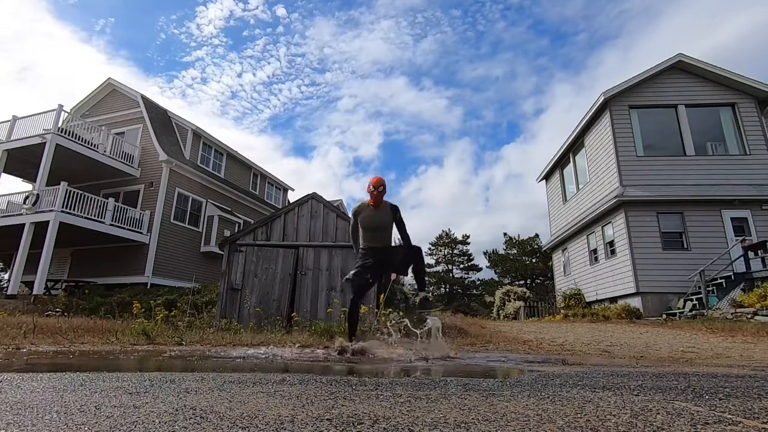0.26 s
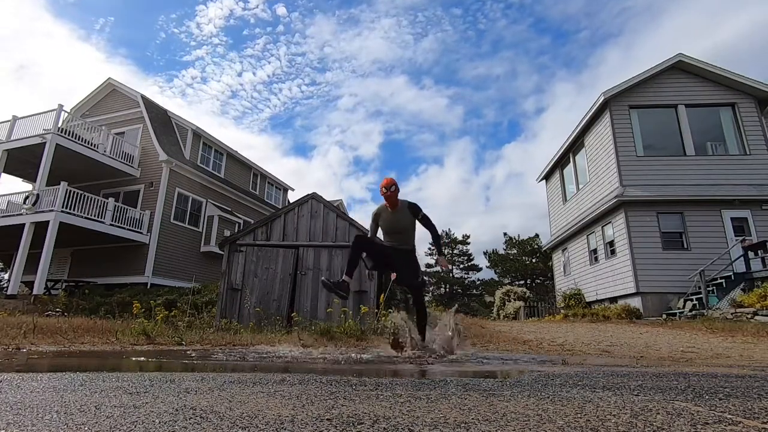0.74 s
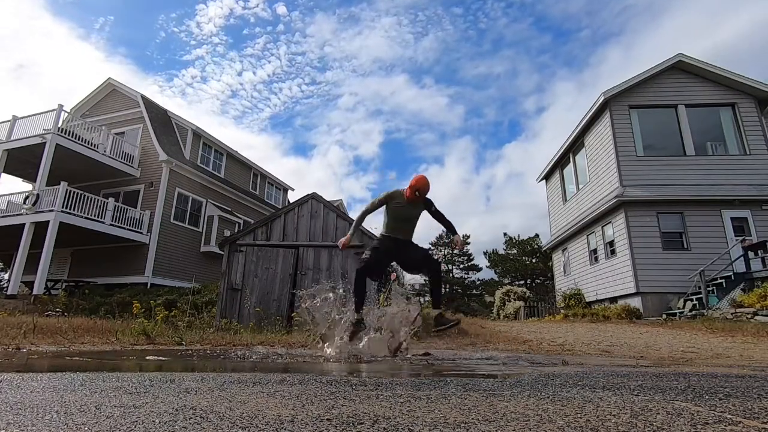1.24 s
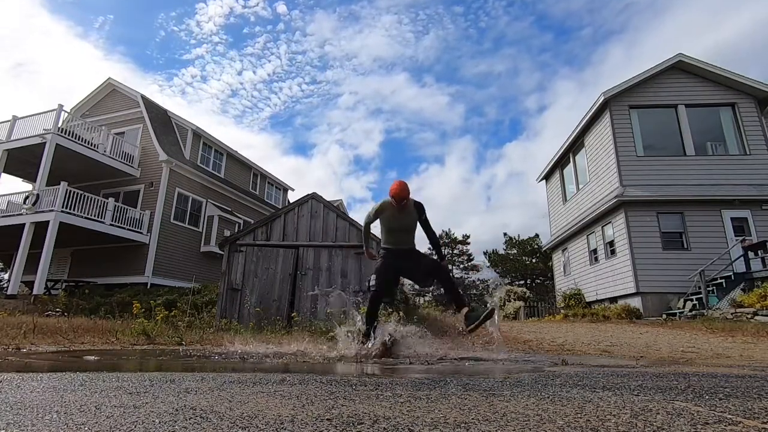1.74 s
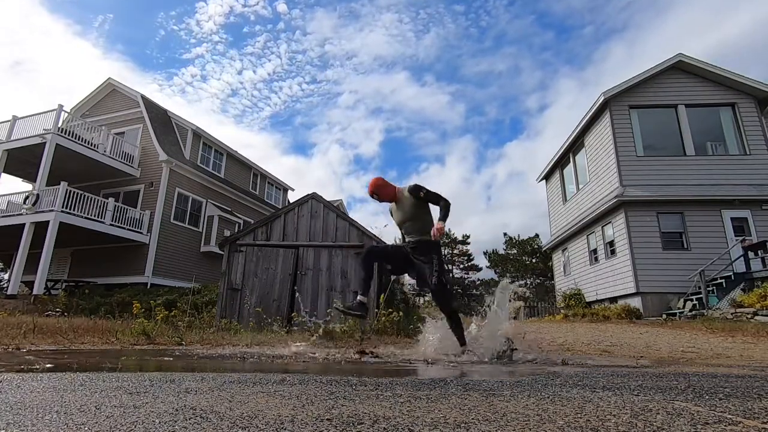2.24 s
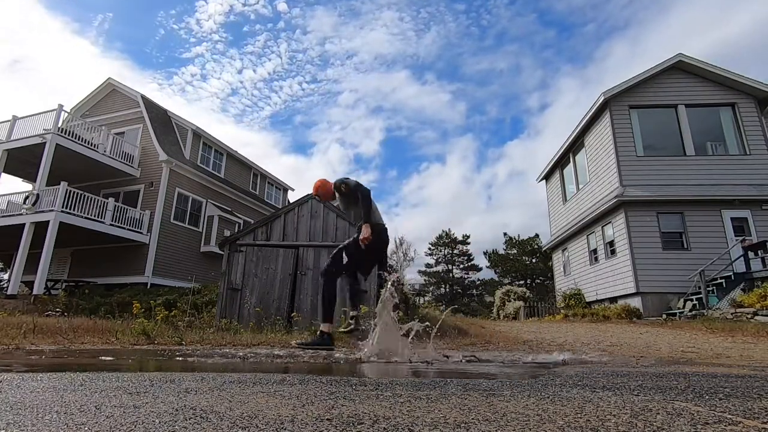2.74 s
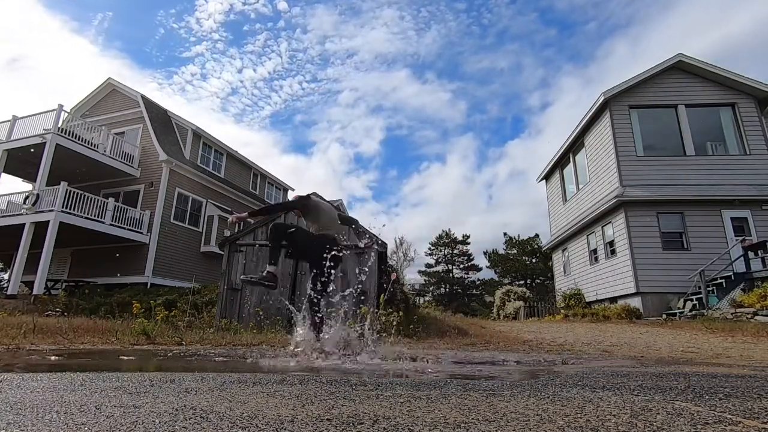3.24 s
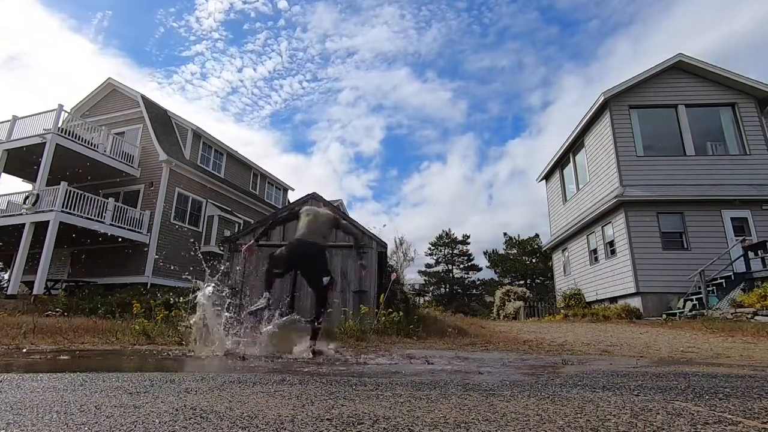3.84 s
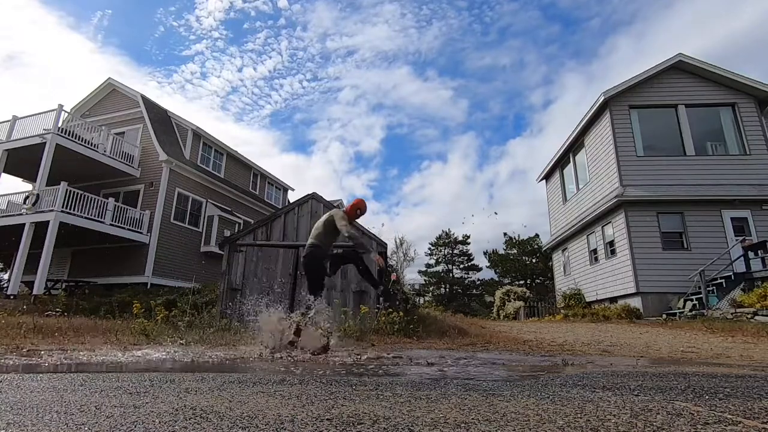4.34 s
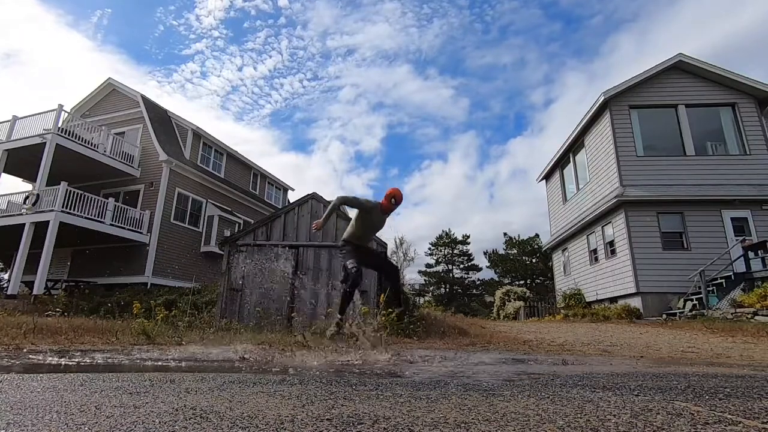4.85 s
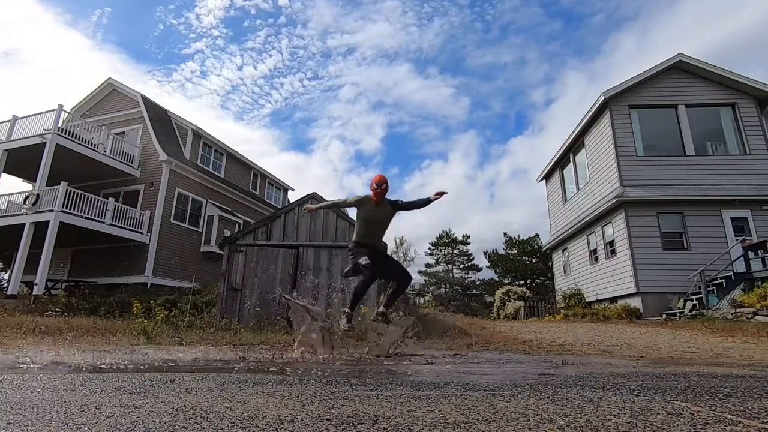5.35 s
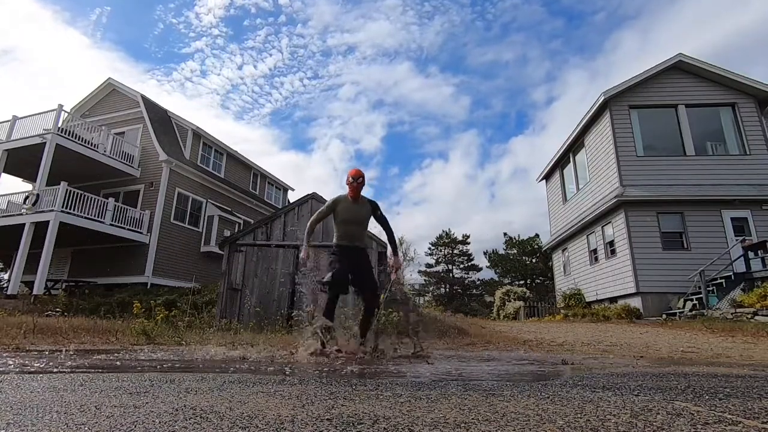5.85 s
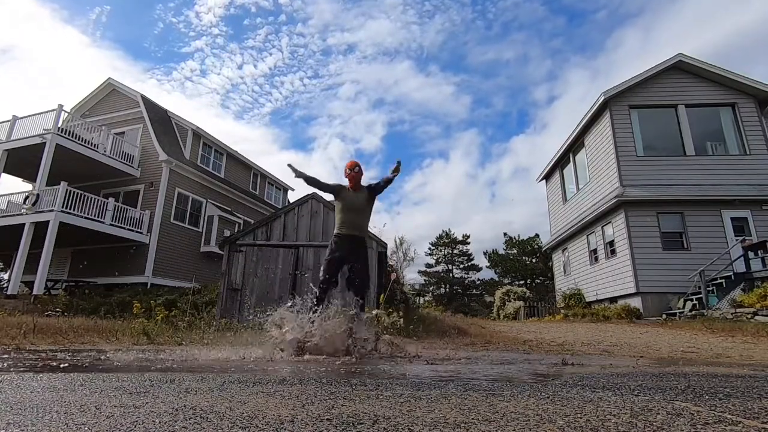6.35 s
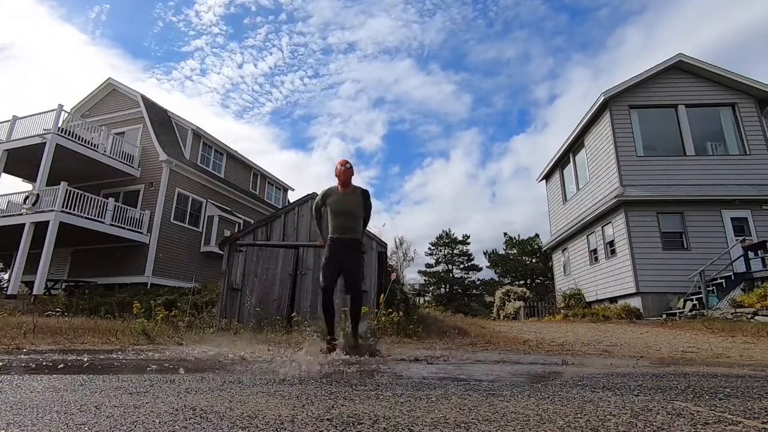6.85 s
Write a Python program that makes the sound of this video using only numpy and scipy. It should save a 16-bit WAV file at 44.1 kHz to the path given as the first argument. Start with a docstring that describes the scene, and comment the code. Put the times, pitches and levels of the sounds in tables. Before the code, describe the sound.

A low stereo microphone a few metres away hears someone stomping in a rain puddle on a paved road. Falling spray is already pattering at 0 s, with a faint steady hum that fades by about 0.7 s. Fairly soft splashes land at 0.25 and 0.63 s, then a sharp slap with a hollow thump at 1.0 s. Steps continue about every 0.35 s, strongest from 2.8 to 4 s, each with a low ground thud, a heel slap and a rain of bright droplets and gurgling bubbles. Fine drops tick near the microphone around 3.5 s. Heavier, slower stomps fall at 5.0 and 5.5 s, then softer-edged ones at 5.8 and 6.2 s, with water sloshing down until 6.7 s. Small quick splashes and round bubble plops finish from 6.8 to 7.1 s. Light breeze and faint house echoes lie beneath.

```python
"""A paved road with a rain puddle: someone stomps in it from foot to foot, a few metres from a low microphone.
Each sole slaps the water (noise bursts), traps a pocket of air that thumps (a falling tone) and shakes
the ground (low noise). The thrown water falls back as spray, drops and mist (random clicks, noise bursts)
and leaves ringing bubbles (short rising tones). Houses give a faint echo (sparse random reflections);
a light breeze (low noise) touches the microphone, and a distant hum (a steady tone) soon fades."""
import sys
import numpy as np
from scipy import signal
from scipy.fft import rfft, irfft
from scipy.io import wavfile

SR = 44100
rng = np.random.default_rng(int(sys.argv[2]) if len(sys.argv) > 2 else 0)


def wav_record(signal):
    """Record a signal, one row per channel, as 16-bit PCM in the file named by sys.argv[1]."""
    frames = np.transpose(np.atleast_2d(signal))
    bounded = np.clip(frames, -1, 1)
    # unit amplitude maps onto the largest positive 16-bit level
    quanta = np.round(bounded * 32767).astype(np.int16)
    wavfile.write(sys.argv[1], SR, quanta)


N = 312832  # length in samples
TIME = np.arange(N) / SR  # seconds

# balance of low and high sound in spray and drops, overall level aside: [pitch_hz, level_db]
SPRAY_COLOUR = [(300, -40.5), (900, -14.5), (1500, 1.5), (2300, 3.5), (3200, 4.5), (4200, -1.5),
                (5600, -8.5), (7500, -13), (11000, -32)]
# a foot hits the puddle: [start_s, slap_db, rise_s, decay_s, brightness_db_per_octave, left_over_right_db,
#   air_pocket_db, pocket_start_pitch_hz, pocket_swell_s, ground_shudder_db, spray_db]
STOMPS = [(0.2528, -19, 0.00036, 0.0091, 3.5, -5, -36, 338, 0.0055, -39.5, -35),
          (0.6335, -24, 0.0016, 0.023, 1.5, -8.5, -29.5, 296, .0066, -43.5, -36),
          (0.9876, -14, 0.00041, 0.0021, 6, -6.5, -11.5, 740, 0.00093, -32.5, -36.5),
          (1.344, -18, 0.00089, 0.0059, 2, -8, -21.5, 424, 0.0019, -40, -33),
          (1.6923, -16, .0003, 0.0032, 2.5, -5, -11, 723, 0.002, -35.5, -47),
          (2.047, -17, 0.00076, .0037, 1, -9, -21, 500, 0.0017, -39, -33),
          (2.4484, -18, 0.00052, 0.0078, 1.5, -8.5, -19.5, 710, 0.0031, -36.5, -36.5),
          (2.805, -11, 0.00089, 0.0023, .5, -2, -14.5, 342, 0.0018, -38, -50),
          (3.1543, -15, 0.001, 0.0026, 0, -2, -13, 570, 0.0024, -40, -41.5),
          (3.519, -13, 0.00012, 0.0043, 1.5, -2, -15.5, 310, 0.0041, -36, -33),
          (3.8709, -14.5, 0.00033, 0.0055, -8, -1.5, -13.5, 382, 0.0021, -34.5, -32.5),
          (4.2293, -16.5, .0004, 0.006, 2, -2, -25, 306, 0.001, -44, -51),
          (4.584, -15.5, 0.0015, 0.0037, -2, -5, -28, 383, 0.003, -35.5, -43),
          (5.008, -17, 0.00023, 0.0088, -2.5, -7, -19.5, 256, 0.0034, -25.5, -34.5),
          (5.493, -18.5, .002, 0.014, -0.5, -6.5, -19.5, 280, 0.0063, -31, -31.5),
          (5.828, -20.5, 0.0053, 0.0038, -1.5, -4.5, -23.5, 470, 0.0027, -52, -32),
          (6.168, -18, 0.0048, 0.013, -3, -2.5, -23, 604, 0.0049, -36, -36),
          (6.791, -28.5, 0.0045, 0.013, -5, 2, -37, 307, 0.0055, -44, -44),
          (6.953, -26.5, 0.011, 0.04, -3.5, -3.5, -42, 592, 0.0067, -55, -38),
          (7.017, -25, 0.0033, 0.015, 0.5, -5.5, -42, 600, 0.0043, -58, -38)]


def gain_of(db):
    """Turns decibels into an amplitude factor."""
    return 10 ** (np.asarray(db) / 20)


def evened(x):
    """Scales a sound to an average (rms) strength of 1."""
    return x / np.sqrt(np.mean(x ** 2) + 1e-20)


def read(points, hz):
    """Reads a table at any frequency, joining its points evenly by musical pitch."""
    point_hz, value = np.transpose(points)
    return np.interp(np.log(hz + 1), np.log(point_hz + 1), value)


def panned(x, pan_db):
    """Makes left louder than right by pan_db; a negative value favours the right."""
    return np.array([x * gain_of(pan_db / 2), x * gain_of(-pan_db / 2)])


def add(mix, s, sound):
    """Mixes a sound in at time s."""
    part = mix[..., max(round(s * SR), 0):][..., :sound.shape[-1]]
    part += sound[..., :part.shape[-1]]


def coloured(x, colour, tilt_db=0, size=4096):
    """Filters with unit energy and no sound ahead of its cause, so that attacks stay sharp."""
    hz = abs(np.fft.fftfreq(size, 1 / SR))
    tilt = tilt_db * np.log2(np.maximum(hz, 400))  # dB per octave above 400 Hz
    log_gain = np.log(gain_of(read(colour, hz) + tilt))
    # the Hilbert transform supplies the phase that puts the energy as early as possible
    spectrum = np.exp(np.conj(signal.hilbert(log_gain)))
    taps = np.fft.ifft(spectrum).real[:size // 2]
    return signal.oaconvolve(x, taps / np.linalg.norm(taps))[:len(x)]


def impacts(per_s, spread_db):
    """Random clicks, up or down; spread_db sets how unequal their sizes are."""
    size = gain_of(spread_db * np.minimum(rng.exponential(1, N), 4))
    direction = rng.choice([-1, 1], N)
    return size * direction * (rng.random(N) < per_s / SR)


def clumps(rate_hz, depth_db, size=N):
    """An uneven flow: a random gain that takes a new value rate_hz times a second."""
    knots = rng.standard_normal(4000)
    position = np.arange(size) / SR * rate_hz
    wander = np.interp(position, np.arange(len(knots)), knots)
    return evened(gain_of(depth_db * wander))


def burst(shape, colour, tilt_db=0, grain=1):
    """A coloured puff of noise with the energy of its envelope."""
    noise = rng.standard_normal(len(shape)) * grain * shape
    puff = coloured(noise, colour, tilt_db)
    return puff * np.linalg.norm(shape) / np.linalg.norm(puff)


def bubble(hz, cycles, glide, size=2600):
    """A bubble rings for some cycles and rises in pitch as it nears the surface."""
    turns = hz * np.arange(size) / SR
    age = turns / cycles
    ring = np.sin(2 * np.pi * turns * (1 + glide * np.minimum(age, 5) / 2))
    return ring * np.exp(-age) * (1 - np.exp(-2 * turns))


def froth(low_hz, high_hz, per_s, spread_db, cycles, scatter_db, count=28):
    """Many bubbles of assorted sizes ring at random times, scattered a little to either side."""
    out = np.zeros((2, N))
    for hz in np.geomspace(low_hz, high_hz, count):
        ring = bubble(hz * rng.uniform(0.94, 1.03), cycles * rng.uniform(0.26, 1.6), glide=0.034)
        starts = impacts(per_s / count, spread_db)
        train = signal.oaconvolve(starts, evened(ring) * np.sqrt(hz))[:N]
        out += panned(train, scatter_db * rng.standard_normal())
    return evened(out)


def outdoors(hum_hz=175, hum_db=-52, hum_end_s=0.5, hum_fade_s=.17, eddies_db=-55):
    """Air makes a low, uneven rumble and separate eddies at each port; a distant tone hums, then fades."""
    # balance of the shared rumble: [pitch_hz, level_db]
    breeze_colour = [(15, -38), (35, -2), (65, 2.5), (130, 1.5), (190, 0), (280, -12), (600, -21.5),
                     (2000, -52)]
    # balance of the eddies: [pitch_hz, level_db]
    gust_colour = [(15, -3), (30, -19), (50, -12), (90, -13.5), (200, -2), (600, -50)]
    # strength of the air moving past the microphone: [time_s, level_db]
    breeze_levels = [(0, -50), (.3, -51.5), (1, -51), (1.7, -55), (3.1, -52), (3.9, -51.5), (4.3, -52),
                     (5.8, -51.5), (6.1, -45.5), (7.09, -50)]
    rumble = evened(coloured(rng.standard_normal(N), breeze_colour)) * clumps(rate_hz=6, depth_db=0.7)
    eddies = evened(np.array([coloured(rng.standard_normal(N), gust_colour) for _ in range(2)]))
    eddies = eddies * clumps(rate_hz=3.9, depth_db=-2.8)
    hum = evened(np.sin(2 * np.pi * hum_hz * TIME))
    hum = hum * np.clip(1 - (TIME - hum_end_s) / hum_fade_s, 0, 1)  # the fade starts at hum_end_s
    breeze_gain = gain_of(np.interp(TIME, *np.transpose(breeze_levels)))
    return breeze_gain * rumble + gain_of(eddies_db) * eddies + gain_of(hum_db) * hum


def landing(s, spread, tail=1.13):
    """Power of a sheet of water coming down: it gathers smoothly, then trails off over tail spreads."""
    age = (TIME - s) / spread
    return np.exp(-np.minimum(np.where(age < 0, age ** 2, age / tail), 60))


def churn(s, fade_s):
    """Power of the water stirred by a foot: there at once, then dying away."""
    return (TIME >= s) * np.exp(-np.minimum(abs(TIME - s) / fade_s, 60))


def water_in_motion(trickle_db=-44, trickle_pan_db=-6, spray_fade_s=0.064, slosh_fade_s=0.057,
                    stomp_slosh_db=-5):
    """Adds up the power of stomps, sheets and a steady trickle: spray and slosh amplitudes, and spray pan."""
    # kicked sheets of water coming down:
    # [thickest_s, spread_s, spray_db, sloshing_db, left_over_right_db]
    sheets = [(.01, .042, -32, -34, 0), (.22, 0.042, -36.5, -43, -6), (.62, 0.086, -38.5, -45.5, -4),
              (.84, 0.23, -42, -49, -7), (1.31, 0.058, -42.5, -48, -6), (1.57, 0.12, -32.5, -39, -7),
              (2.0, 0.061, -37, -47.5, -5.5), (2.17, 0.084, -34, -39, -6), (2.35, 0.06, -31.5, -36, -5.5),
              (2.58, 0.053, -42, -37.5, -25), (2.8, 0.075, -41.5, -43, -16), (3.04, 0.18, -33.5, -39, -4.5),
              (3.52, 0.088, -36, -42, -3), (3.85, 0.19, -36, -37.5, 1), (4.135, 0.059, -31, -36.5, 4.5),
              (4.56, 0.2, -38.5, -60, -5), (4.78, 0.15, -44, -58, -9), (4.99, 0.087, -37.5, -52, 0),
              (5.34, 0.045, -38.5, -51.5, 1), (5.5, 0.035, -31, -41, -4), (5.7, 0.13, -36, -43, 0.5),
              (6.13, 0.13, -32, -38, -2), (6.51, 0.17, -37.5, -41, -1), (6.66, 0.063, -30, -36.5, -1),
              (6.78, .025, -33.5, -36.5, -8), (6.84, 0.013, -34.5, -44, -1)]
    falling, sloshing = np.full(N, gain_of(trickle_db) ** 2), np.zeros(N)
    side = falling * trickle_pan_db  # pan weighted by power
    for s, _, _, _, _, pan_db, *_, spray_db in STOMPS:
        power = gain_of(spray_db) ** 2 * churn(s, spray_fade_s)
        falling, side = falling + power, side + power * pan_db
        sloshing += gain_of(spray_db + stomp_slosh_db) ** 2 * churn(s, slosh_fade_s)
    for s, spread, spray_db, slosh_db, pan_db in sheets:
        shape = landing(s, spread)
        power = gain_of(spray_db) ** 2 * shape
        falling, side = falling + power, side + power * pan_db
        sloshing += gain_of(slosh_db) ** 2 * shape
    return np.sqrt(falling), np.sqrt(sloshing), side / falling


def spray(patter_db=-1, froth_db=-7, side_db=4):
    """Thrown water patters back in clots and whips up tiny bubbles."""
    streams = [panned(impacts(per_s=3000, spread_db=1.0), side * side_db) for side in (-1, 0, 1)]
    patter = evened(sum(streams))
    fizz = froth(1291, 5730, per_s=1800, spread_db=3.0, cycles=5.5, scatter_db=7.5)
    clots = patter * clumps(rate_hz=110, depth_db=3.0)
    water = gain_of(patter_db) * clots + gain_of(froth_db) * fizz
    return evened(np.array([coloured(channel, SPRAY_COLOUR) for channel in water]))


def slosh(wash_db=3):
    """The churned puddle gurgles with larger bubbles over an uneven wash of clicks."""
    # balance of the sloshing: [pitch_hz, level_db]
    slosh_colour = [(100, -36), (250, 2.5), (450, -4.5), (750, -1.5), (1150, 0.5), (1700, -3), (3000, -36)]
    gurgle = froth(441, 1764, per_s=650, spread_db=2.5, cycles=2.55, scatter_db=3)
    wash = evened(impacts(per_s=3300, spread_db=5.0)) * clumps(rate_hz=85, depth_db=4.5)
    water = gurgle + gain_of(wash_db) * wash
    return evened(np.array([coloured(channel, slosh_colour) for channel in water]))


def mist(shared=0.61):
    """Fine droplets tick on the asphalt round the microphone, some heard on both sides, some on one."""
    # balance of the mist: [pitch_hz, level_db]
    mist_colour = [(3000, -12), (5500, 8), (7000, 4), (8000, 1.5), (9200, 2.5), (11000, -9), (13000, -13),
                   (15500, -45)]
    centre = shared * impacts(per_s=2100, spread_db=5.5)
    sides = [centre + impacts(per_s=4000, spread_db=2.0) for _ in range(2)]
    return evened(np.array([coloured(ticks, mist_colour) for ticks in sides]))


def mist_strength(below_spray_db=-13, floor_db=-53.5):
    """Amplitude that follows the spray around one steady part, plus separate showers."""
    # showers of fine droplets reaching the microphone: [thickest_s, spread_s, level_db]
    shower_list = [(3.49, 0.031, -39.5), (4.3, 0.091, -54), (4.73, 0.071, -46), (5.16, 0.014, -42),
                   (6.82, 0.027, -48)]
    # how much of the mist, showers aside, carries to the microphone: [time_s, level_db]
    mist_reach = [(0, -1), (2.6, 0), (3.3, 0), (4.7, 0.5), (5.9, 0), (6.8, 0.5), (6.95, -4)]
    falling, _, _ = water_in_motion()
    power = gain_of(floor_db) ** 2 + (gain_of(below_spray_db) * falling) ** 2
    reach = gain_of(np.interp(TIME, *np.transpose(mist_reach)))
    showers = sum(gain_of(db) ** 2 * landing(s, spread) for s, spread, db in shower_list)
    return np.sqrt(power * reach ** 2 + showers)


def stray_drops(level_db=-17):
    """Smaller drops splat as short filtered clicks at random times."""
    clicks = impacts(per_s=60, spread_db=-1.0)
    return gain_of(level_db) * evened(coloured(clicks, SPRAY_COLOUR, tilt_db=-4.0))


def plops(cycles=6):
    """Large bubbles left by the closing water ring with a slightly rising pitch."""
    # large bubbles that ring out: [start_s, level_db, start_pitch_hz]
    bubble_list = [(.149, -28, 1160), (1.98, -25.5, 746), (2.877, -20, 770), (3.666, -20, 1430),
                   (3.753, -26.5, 1400), (4.107, -25, 1110), (4.36, -21.5, 1840), (4.584, -21.5, 722),
                   (5.117, -25.5, 1750), (5.517, -17, 1250), (5.705, -20, 1060), (5.735, -22.5, 1580),
                   (5.867, -23.5, 634), (6.37, -24, 1480), (6.411, -25.5, 1370), (6.649, -24.5, 684),
                   (6.77, -27, 717), (6.793, -25, 763), (6.96, -19.5, 1084), (7.022, -17, 874),
                   (7.042, -18, 720)]
    out = np.zeros(N)
    for s, db, hz in bubble_list:
        add(out, s, gain_of(db) * bubble(hz, cycles, glide=0.021))
    return out


def drops(splat_db=2.0, ring_db=0, cycles=5, size=2600):
    """Each large drop splats and rings briefly; a clot of water splats for longer."""
    # single large drops and clots landing: [start_s, level_db, ring_start_pitch_hz, splat_decay_s]
    drop_list = [(.191, -30, 1900, 0.0013), (0.602, -26, 1480, 0.003), (1.509, -30, 2420, .002),
                 (1.609, -20.5, 3630, 0.00067), (1.949, -25.5, 2870, .0007), (2.102, -34, 2570, .002),
                 (2.598, -29, 2720, 0.00092), (3.006, -29, 2800, .003), (3.08, -23, 3020, 0.0014),
                 (3.2685, -18.5, 2910, 0.0012), (3.3412, -24, 3480, .001), (3.443, -21, 3000, 0.0013),
                 (4.306, -31, 3340, 0.0014), (4.458, -29.5, 2360, .002), (4.55, -25.5, 3000, 0.0018),
                 (4.728, -24, 2900, .0015), (4.78, -28.5, 2970, 0.0054), (4.823, -28.5, 1630, .004),
                 (4.949, -23.5, 2400, .001), (4.973, -22.5, 4140, .001), (5.131, -25, 2900, 0.002),
                 (5.311, -29.5, 3000, .0015), (5.472, -25, 3540, .0015), (5.654, -26, 2940, 0.0013),
                 (5.7, -24, 3900, .001), (6.039, -21.5, 1960, 0.00086), (6.084, -23, 2730, .001),
                 (6.141, -17.5, 4000, 0.0016), (6.765, -30, 3220, .002), (6.7688, -17, 3980, .001)]
    out, t = np.zeros(N), np.arange(size) / SR
    for s, db, hz, splat_s in drop_list:
        splat = burst(np.exp(-t / splat_s), SPRAY_COLOUR, tilt_db=4.5)
        ring = bubble(hz, cycles, glide=.04)
        add(out, s, gain_of(db) * (gain_of(splat_db) * splat + gain_of(ring_db) * ring))
    return out


def falling_water(slosh_pan_db=-1, mist_pan_db=0.5, blips_db=-16):
    """Spray and sloshing swell unevenly with each kick, with some ringing bubbles; mist follows the spray."""
    falling, sloshing, pan_db = water_in_motion()
    blips = froth(914, 2140, per_s=27, spread_db=0.0, cycles=12.7, scatter_db=3, count=16)
    thrown = spray() * clumps(rate_hz=51, depth_db=0.18) + stray_drops() + gain_of(blips_db) * blips
    near = thrown * falling + drops() + plops()
    near = near + slosh() * panned(sloshing, slosh_pan_db)
    placed = near * panned(np.ones(N), pan_db)  # all of it leans to the side where the spray is
    return placed + mist() * panned(mist_strength(), mist_pan_db)


def slap(rise, decay, tilt_db, crack_db=4, crack_s=0.00059, size=6000):
    """A sole tears the water in a ragged noise burst; the faster the rise, the harder the first crack."""
    # balance of the slap: [pitch_hz, level_db]
    slap_colour = [(60, -15), (200, -2.5), (500, 1.5), (900, 2.5), (1500, 1), (3000, 2.5), (4500, -6),
                   (6500, -11.5), (9000, -19.5), (11500, -30), (15500, -49)]
    t = np.arange(size) / SR
    shape = np.minimum(t / rise, 1) * np.exp(-np.maximum(t - rise, 0) / decay)
    tearing = burst(shape, slap_colour, tilt_db, clumps(rate_hz=630, depth_db=1.5, size=size))
    crack = burst(np.exp(-t / crack_s), slap_colour, tilt_db=0)
    return tearing + gain_of(crack_db) * np.exp(-rise / crack_s) * crack


def pocket(hz, swell, fall_per_swell=1.77, end_share=0.13, open_hz=58, size=6000):
    """Air trapped under the sole pulses a few times, falling in pitch as the cavity opens."""
    t = np.arange(size) / SR
    end_hz = open_hz + end_share * hz
    pitch = end_hz + (hz - end_hz) * np.exp(-t / (fall_per_swell * swell))
    pulse = -np.sin(2 * np.pi * np.cumsum(pitch) / SR)
    return pulse * t / swell * np.exp(1 - t / swell)


def shudder(lag_s=.025, size=13000):
    """The body's weight shakes the ground: low noise that is strongest after lag_s."""
    # balance of the ground shake: [pitch_hz, level_db]
    shudder_colour = [(20, -34), (45, -2.5), (75, -4.5), (140, -4), (220, -14), (400, -12), (900, -48)]
    t = np.arange(size) / SR
    return burst(t / lag_s * np.exp(1 - t / lag_s), shudder_colour)


def feet(heel_pan_share=0.69, heel_rise_share=.07, heel_swell_s=.003):
    """Each stomp slaps, thumps and shakes the ground; the heel slaps and thumps again, nearer the centre."""
    # the heel follows, or the water closes over the foot:
    # [start_s, slap_db, decay_s, brightness_db_per_octave, air_pocket_db, pocket_start_pitch_hz]
    heel_list = [(.275, -25, 0.018, -1.5, -46, 258), (.658, -21.5, 0.0081, -4, -24.5, 690),
                 (0.9946, -21.5, 0.0083, 2.5, -42, 298), (1.016, -26.5, 0.0042, -4, -34, 262),
                 (1.366, -24, 0.019, -0.5, -30, 400), (1.697, -29, 0.054, 1.5, -19.5, 246),
                 (2.459, -23.5, 0.026, -1, -24.5, 270), (2.826, -46, .006, -2, -23, 190),
                 (2.876, -24, 0.0065, -.5, -48, 596), (3.177, -22, 0.0088, -10, -25.5, 514),
                 (3.542, -29, 0.046, -4, -19.5, 700), (3.879, -23, .01, -1, -32, 400),
                 (3.892, -29, 0.019, -3.5, -22, 395), (4.237, -21.5, 0.01, -0.5, -26, 266),
                 (4.599, -23, 0.01, 0, -29, 378), (5.0325, -17.5, 0.0063, -1, -22, 620),
                 (5.513, -23, 0.018, 0, -21, 300), (5.864, -23, .015, 0.5, -28, 486),
                 (6.184, -20, 0.017, -3.5, -19, 172), (6.206, -24.5, 0.011, -6, -43, 593),
                 (7.043, -22, 0.018, -4, -40, 775)]
    out = np.zeros((2, N))
    for s, db, rise, decay, tilt_db, pan_db, pocket_db, hz, swell, shudder_db, _ in STOMPS:
        add(out, s, panned(gain_of(db) * slap(rise, decay, tilt_db), pan_db))
        add(out, s + rise / 2, gain_of(pocket_db) * pocket(hz, swell))
        add(out, s, gain_of(shudder_db) * shudder())
    times, _, _, _, _, pans, *_ = np.transpose(STOMPS)
    for s, db, decay, tilt_db, pocket_db, hz in heel_list:
        pan_db = heel_pan_share * np.interp(s, times, pans)
        rise = heel_rise_share * decay
        add(out, s, panned(gain_of(db) * slap(rise, decay, tilt_db), pan_db))
        add(out, s, gain_of(pocket_db) * pocket(hz, heel_swell_s))
    return out


def houses(x, t60=0.98, build_s=0.01, size=22000):
    """Walls return sparse, dull reflections that build up, then fade at 60 dB per t60 seconds."""
    t = np.arange(size) / SR
    sparse = rng.standard_normal((2, size)) * (rng.random((2, size)) < .04)
    taps = sparse * np.minimum(t / build_s, 1) * gain_of(-60 * t / t60)
    band = signal.butter(1, [350, 6000], "band", fs=SR, output="sos")
    tail = signal.sosfilt(band, taps)
    return signal.fftconvolve(x, tail / np.linalg.norm(tail[0]), axes=1)[:, :N]


def scene(echo_db=-19):
    """Stomps and falling water with their echo, in the open air."""
    splash = feet() + falling_water()
    return splash + gain_of(echo_db) * houses(splash) + outdoors()


def record(dry, edge_hz=15300):
    """Two close ports: the right lags, mostly in the treble; width varies with pitch; the top is cut off."""
    # how far the right port lags: [pitch_hz, lag_radians]
    port_lag = [(5000, 0.12), (7000, 1.83), (9000, 1.8), (15000, 2.45)]
    # gain on the difference between left and right: [pitch_hz, difference_db]
    width = [(30, 5), (70, -3), (150, -7.5), (300, -10.5), (700, -2.5), (1300, -1.5), (2400, -9.5),
             (4500, -7), (8000, -3.5), (14000, -4.5)]
    hz, (left, right) = np.fft.rfftfreq(N, 1 / SR), rfft(dry)
    right = right * np.exp(-1j * read(port_lag, hz))
    mid = (left + right) / 2
    side = (left - right) / 2 * gain_of(read(width, hz))
    pair = irfft(np.array([mid + side, mid - side]), N)
    low_pass = signal.firwin(511, edge_hz, window=("kaiser", 9), fs=SR)
    return signal.oaconvolve(pair, low_pass[None], "same")


dry = scene()
out = record(dry)
wav_record(out)
```